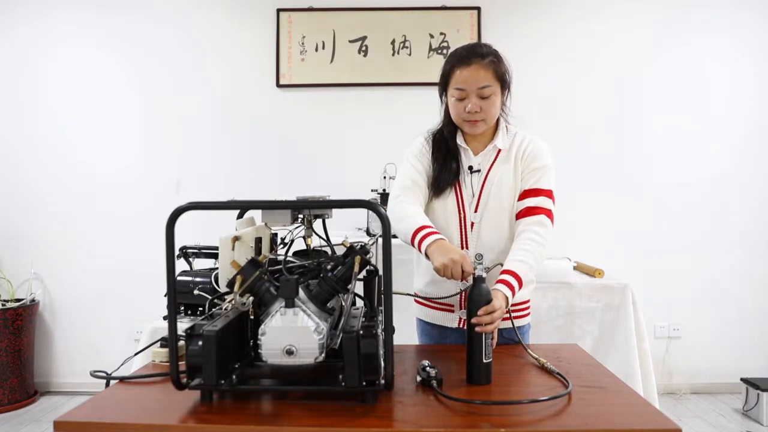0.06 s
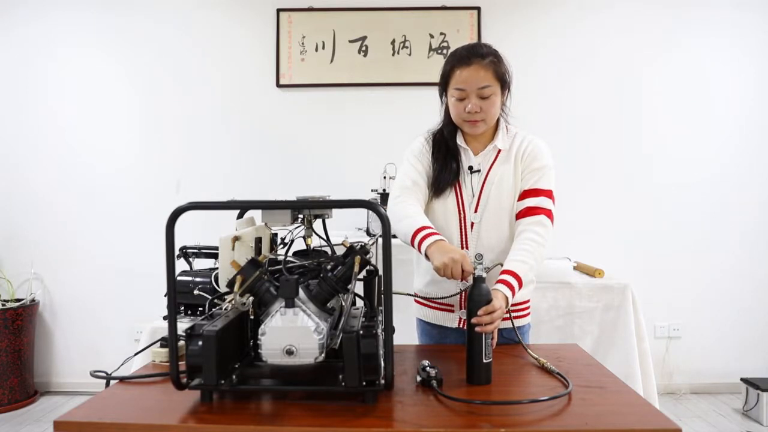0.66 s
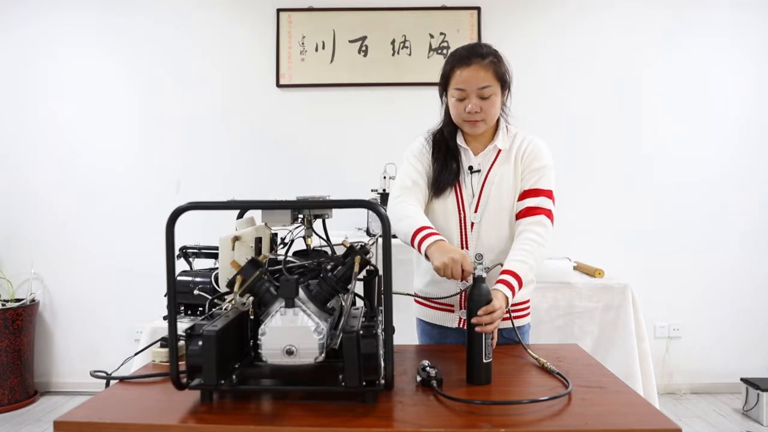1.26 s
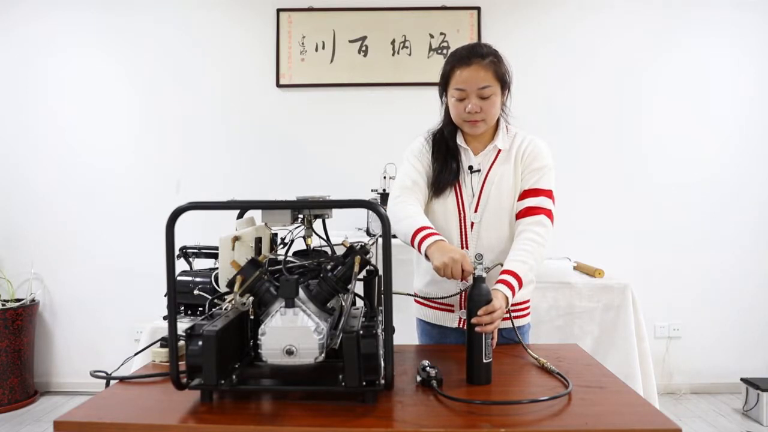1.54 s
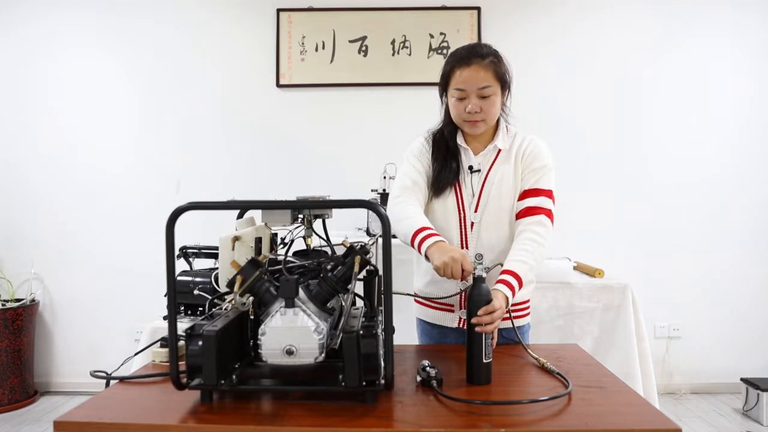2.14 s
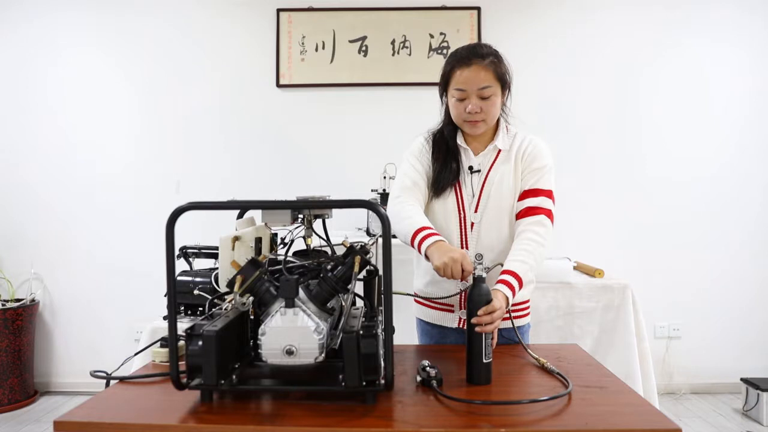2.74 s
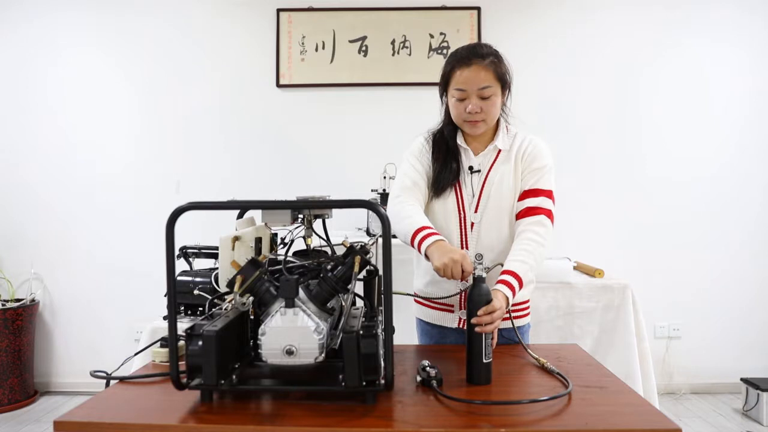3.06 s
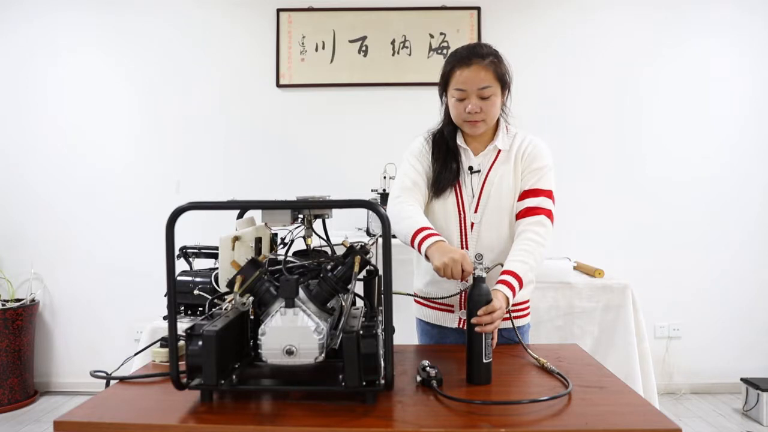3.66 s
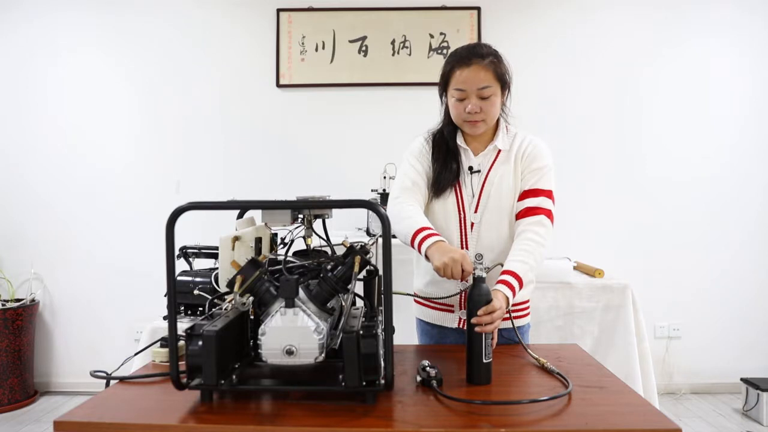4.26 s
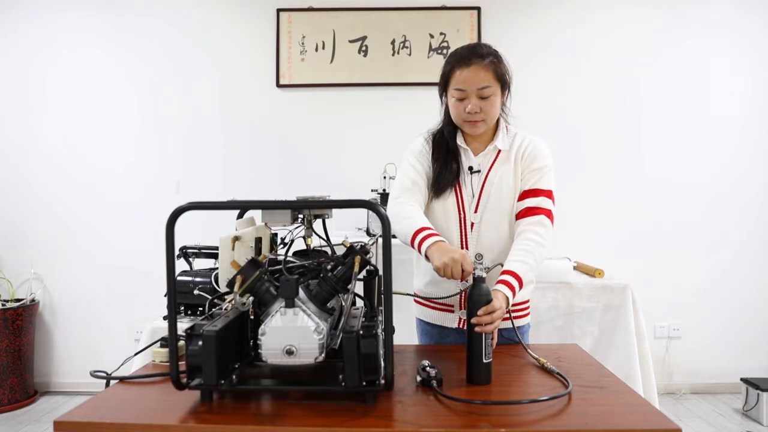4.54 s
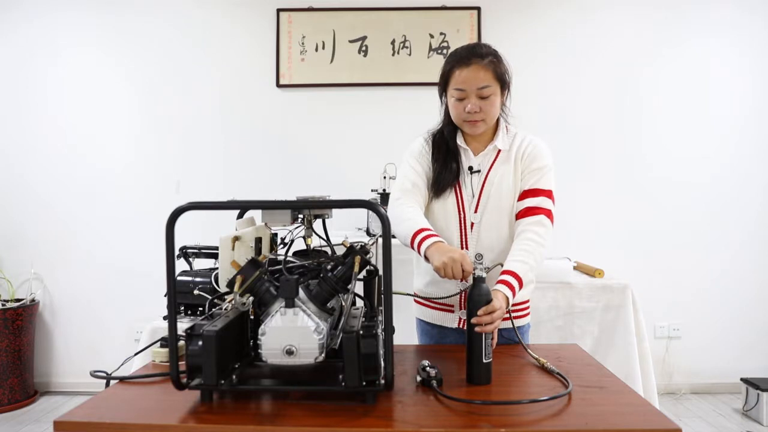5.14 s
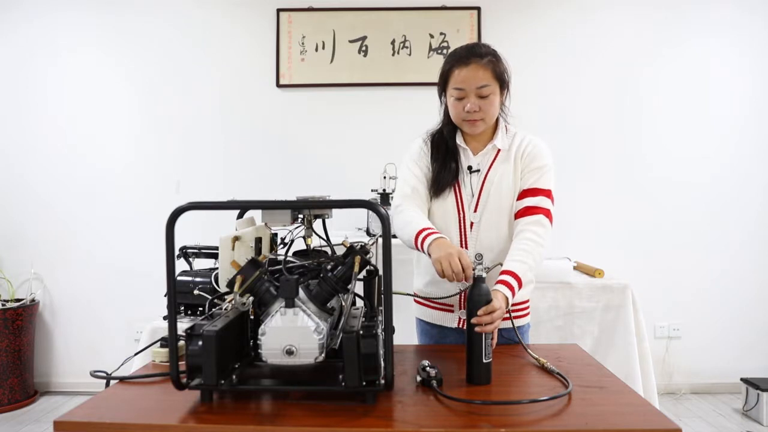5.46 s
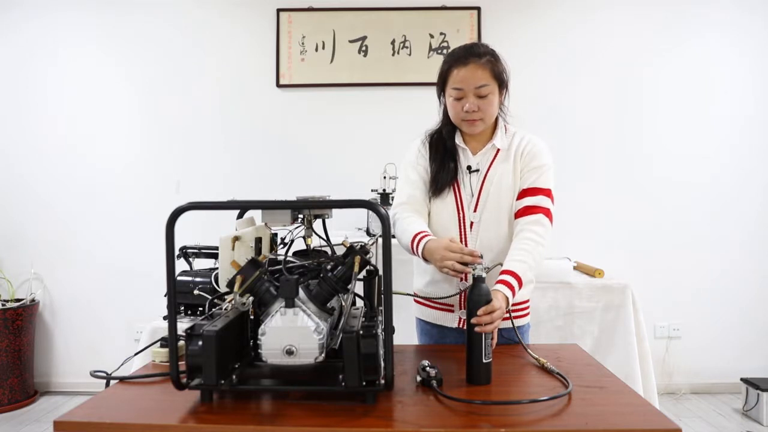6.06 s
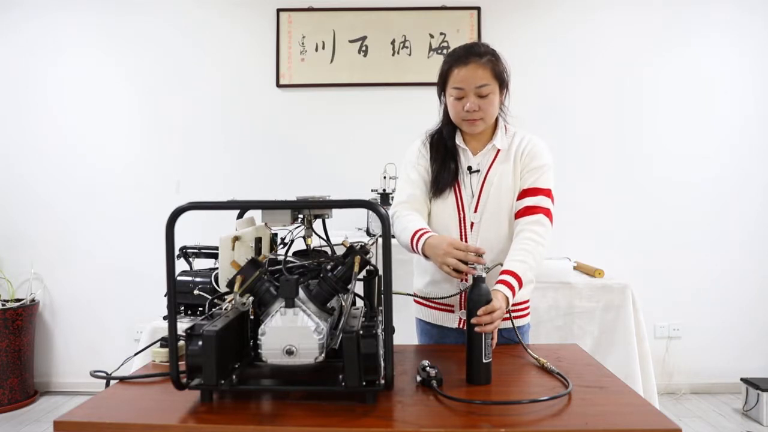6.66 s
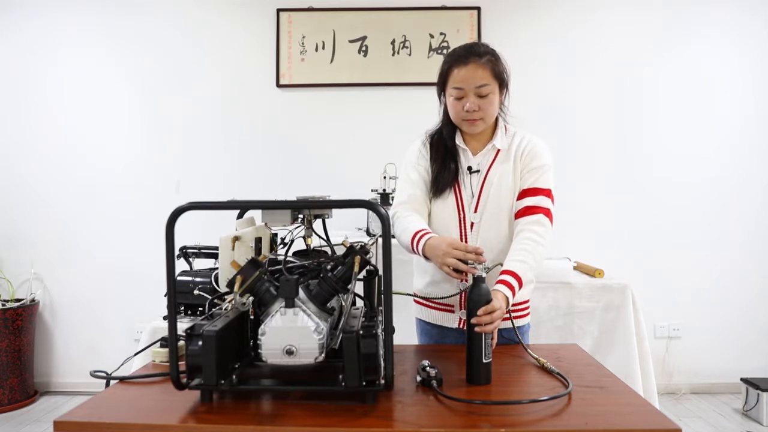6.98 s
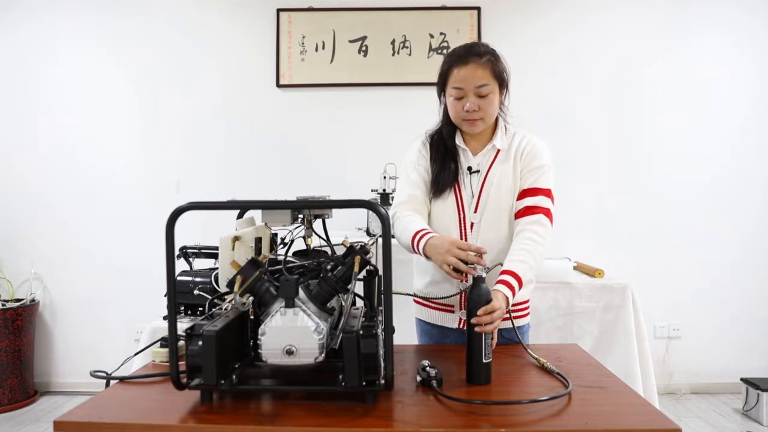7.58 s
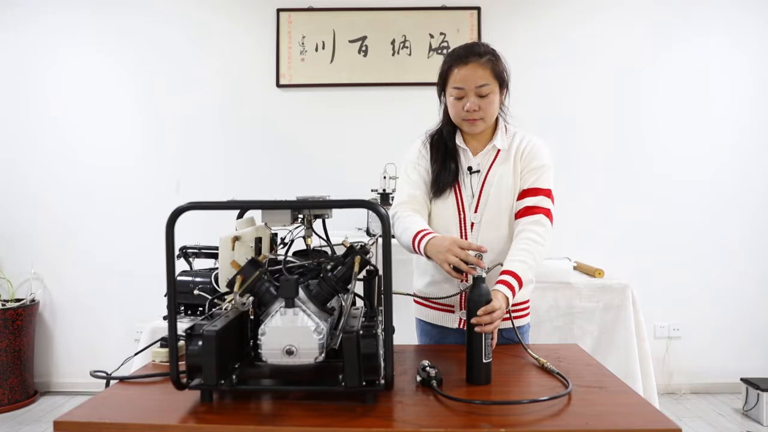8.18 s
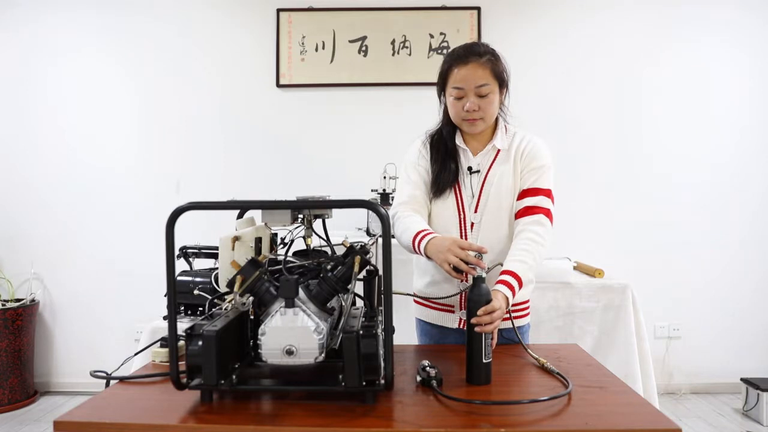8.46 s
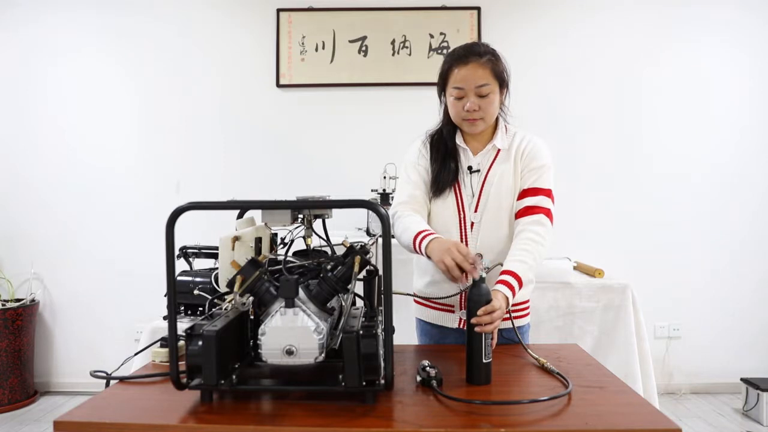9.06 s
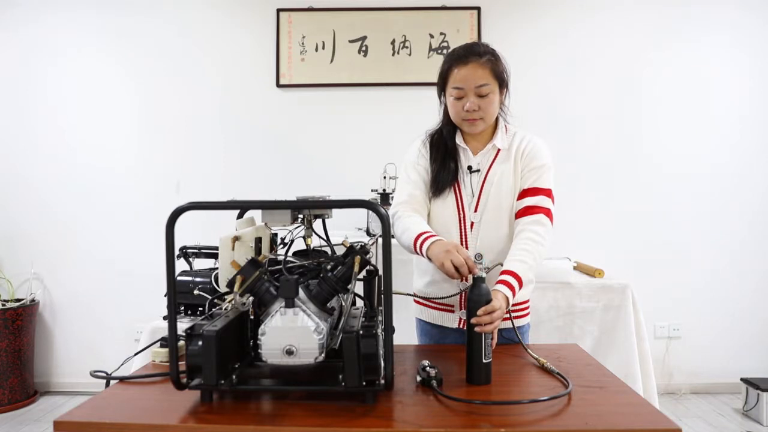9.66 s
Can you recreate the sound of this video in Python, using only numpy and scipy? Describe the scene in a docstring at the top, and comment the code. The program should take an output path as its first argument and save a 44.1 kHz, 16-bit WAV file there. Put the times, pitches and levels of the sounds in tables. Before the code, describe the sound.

A close, steady hiss of compressed air escaping a fitting, flecked with spitting crackles, grows fuller and uneven.

```python
"""High-pressure air bleeds from the fill fitting of a small cylinder, close by, in a faintly answering room.
At first the turbulent jet is a thin, steady hiss in which specks of condensate spit and crackle.
From about 3 s the screw is turned: the jet widens, sags as the gap clogs and spurts as air breaks through.
Between 5 and 6 s a hand cups the valve and shifts its resonances; the jet sputters on to the end."""
import sys
import numpy as np
from scipy import signal
from scipy.fft import rfft, irfft, next_fast_len
from scipy.io import wavfile
from scipy.ndimage import uniform_filter1d, map_coordinates

SR = 44100
rng = np.random.default_rng(int(sys.argv[2]) if len(sys.argv) > 2 else 0)


def log_audio(samples):
    """Write samples as a 16-bit WAV file to the path given in sys.argv[1]."""
    # one column per channel
    frames = np.atleast_2d(samples).T
    # limit to full scale, then quantise
    limited = np.clip(frames, -1, 1)
    pcm = np.round(limited * 32767).astype(np.int16)
    wavfile.write(sys.argv[1], SR, pcm)


N = 432621
TIME = np.arange(N) / SR


def amp(db):
    """Amplitude ratio of a level in decibels."""
    return 10 ** (np.asarray(db) / 20)

def unit(x):
    """Normalisation to unit rms."""
    return x / np.sqrt(np.mean(x ** 2) + 1e-20)

def along(points, hz):
    """Interpolation of (frequency, value) points on a logarithmic frequency axis."""
    frequencies, values = np.transpose(points)
    return np.interp(np.log(hz + 1), np.log(frequencies + 1), values)

def curve(points):
    """Linear interpolation of (time, value) points at every sample."""
    return np.interp(TIME, *np.transpose(points))

def wobble(knots_per_s):
    """Smooth fluctuation: a spline through Gaussian random values."""
    knots = rng.standard_normal(int(N * knots_per_s / SR) + 4)
    return map_coordinates(knots, [TIME * knots_per_s])

def bells(rows, axis):
    """Superposition of Gaussian peaks and dips (centre, width, gain [dB]) in frequency or time."""
    return sum(db * .5 ** ((2 * (axis - centre) / width) ** 2) for centre, width, db in rows)

def coloured(x, db_at):
    """Minimum-phase filtering to the gain db_at(frequency), by folding the cepstrum."""
    size = 2 * next_fast_len(N // 2 + SR // 4)
    hz = np.fft.rfftfreq(size, 1 / SR)
    cepstrum = irfft(np.log(amp(db_at(hz)) + 1e-6))
    cepstrum[1:size // 2] *= 2
    cepstrum[size // 2 + 1:] = 0
    return irfft(rfft(x, size) * np.exp(rfft(cepstrum)))[:N]

def below(x, edge_hz, order):
    """Zero-phase low-pass filtering."""
    size = next_fast_len(N + SR // 2)
    hz = np.fft.rfftfreq(size, 1 / SR)
    return irfft(rfft(x, size) / (1 + (hz / edge_hz) ** order), size)[:N]


# Decay of the room: (frequency [Hz], reverberation time [s])
ROOM_T60 = [(200, 0.32), (3000, 0.69), (15000, 0.22)]

def room(x):
    """Reflection: one weak echo from the nearest wall, then a faint, exponentially decaying tail."""
    hz, t, spectrum = signal.stft(rng.standard_normal(SR // 2), SR, nperseg=256)
    decay = amp(-60 * t / along(ROOM_T60, hz)[:, None])
    tail = signal.istft(spectrum * decay, SR, nperseg=256)[1]
    echo = np.pad(x, (round(.00934 * SR), 0))[:N]
    reverberation = signal.fftconvolve(echo, tail / np.linalg.norm(tail))[:N]
    return amp(-30) * echo + amp(-23) * reverberation


# Spectrum of the spent stream: (frequency [Hz], relative spectral level [dB])
EDDY_SPECTRUM = [(15, -25), (30, -12), (60, -3), (140, 0), (400, 0.5), (750, -0.5), (1100, -5), (2000, -13),
                 (5000, -81)]

def eddies(rumble_db, lumpy_db):
    """Turbulent break-up: the spent stream dissolves into a soft, lumpy rumble."""
    rumble = unit(coloured(rng.standard_normal(N), lambda hz: along(EDDY_SPECTRUM, hz)))
    return rumble * amp(rumble_db + lumpy_db * wobble(60))


# Spectrum of one drop's pulse: (frequency [Hz], gain [dB])
DROP_SPECTRUM = [(20, -25), (70, -7), (180, 2), (600, 0.5), (1200, -3), (2800, -6), (3800, -8), (5000, -2),
                 (15000, -1)]
# Spits of the larger drops: (time [s], relative level [dB])
SPITS = [(0.146, -19), (0.392, -21), (0.926, -21), (0.963, -19), (1.349, -23), (1.452, -26), (1.718, -15),
         (1.815, -20), (2.007, -23), (2.166, -21), (2.543, -33), (2.859, -19.5), (3.044, -21), (3.3, -22),
         (3.411, -18), (3.457, -16), (3.934, -19), (4.083, -16.5), (4.761, -22), (5.015, -20), (5.789, -26),
         (5.817, -14), (6.029, -17), (6.522, -18), (8.295, -23), (8.562, -19), (9.003, -20), (9.721, -20)]

def condensate(rumble_db, specks_per_s, spread_db, spit_gain_db, puff_db, puff_s):
    """Impulse excitation: each drop blown through the gap is a pressure pulse; large ones trail a puff."""
    sizes = amp(spread_db * np.minimum(rng.exponential(size=N), 3)) * rng.choice([-1, 1], N)
    specks = unit(sizes * (rng.random(N) < specks_per_s / SR))
    above_rumble_db = np.interp(TIME, [3.5, 6], [10, 8])  # thin jet, then wide jet
    pulses = specks * amp(rumble_db + above_rumble_db)
    age = np.arange(SR // 20) / SR
    for at, db in SPITS:
        impulse = (age == 0) * rng.choice([-1, 1])
        puff = amp(puff_db) * np.exp(-age / puff_s) * rng.standard_normal(len(age))
        pulses[round(at * SR):][:len(age)] += amp(db + spit_gain_db) * (impulse + puff)
    return coloured(pulses, lambda hz: along(DROP_SPECTRUM, hz))


# The gap clogs: (time of clearing [s], duration [s], hiss loss [dB], roar loss [dB], recovery [s])
CHOKES = [(3.914, 0.126, 1, 3, 0.012), (4.071, 0.08, 3, 1.0, 0.012), (4.324, 0.13, 2, 8.5, 0.008),
          (4.425, 0.07, 1, 1, 0.012), (4.776, 0.1, -1, 6.5, 0.027), (4.875, 0.066, 7.5, 1.5, 0.012),
          (5.015, 0.15, 5, -1.5, 0.006), (5.119, 0.098, 2.0, 2.5, 0.008), (5.308, 0.015, 5.0, 2.5, 0.008),
          (5.611, 0.27, 3, 0.5, 0.012), (5.942, 0.036, 4.0, 1, 0.008), (6.022, 0.07, 4.0, -1.5, 0.008),
          (6.143, 0.13, 2, -2, 0.012), (6.347, 0.27, 0, 5.5, 0.025), (6.541, 0.12, 3, 2.5, 0.012),
          (6.62, 0.035, 0, 6, 0.012), (6.806, 0.034, 0.0, 8, 0.0085), (7.064, 0.068, 5.5, 5.5, 0.01),
          (7.143, 0.067, 2.5, 3.5, 0.012), (7.72, 0.15, 0.0, 4, 0.02), (7.903, 0.12, 7, 4.5, 0.018),
          (8.113, 0.029, 4, 2.0, 0.012), (8.229, 0.031, 3.5, 0.5, 0.012), (8.545, 0.18, 10.5, 1.5, 0.056),
          (8.713, 0.095, 8.0, -1, 0.022), (8.885, 0.081, 3.5, 2.0, 0.02), (9.189, 0.13, 7.5, 7.5, 0.012),
          (9.333, 0.11, 8.0, 4.5, 0.01), (9.4, 0.061, 8.5, 1, 0.016), (9.52, 0.062, 4.5, 2, 0.008),
          (9.612, 0.081, 4, 6.0, 0.016), (9.655, 0.037, 5, 9, 0.0072), (9.713, 0.049, 2, 7, 0.008)]
# Pent-up air breaks through: (time [s], decay time [s], hiss gain [dB], roar gain [dB])
SPURTS = [(1.403, 0.041, 2.0, 0.5), (3.042, 0.037, 0, 2.0), (3.298, 0.11, 2.5, 2.5), (3.723, 0.1, 3.5, 2),
          (3.91, 0.07, 3.5, -0.5), (4.073, 0.085, 3.5, -3.5), (4.344, 0.032, 1, 2), (4.48, 0.075, 4, -1.5),
          (4.666, 0.038, 6, 0.5), (5.012, 0.049, 4, 1), (5.118, 0.021, 2, 5), (5.408, 0.015, 4.5, -1),
          (5.617, 0.17, 0.0, 5.5), (5.726, 0.036, 2.5, 3.5), (6.027, 0.05, 3.5, 1.5), (6.37, 0.081, 5, -1),
          (6.54, 0.026, 1.5, 1.5), (6.826, 0.25, 3, 1.5), (7.408, 0.24, 2.5, 1), (7.9, 0.046, 1.5, 2),
          (8.056, 0.055, 0.5, 5), (8.287, 0.092, 1, 1.5), (8.56, 0.05, 3, 0.5), (8.715, 0.047, 3.5, 2),
          (9.004, 0.013, 3.5, 8.5), (9.18, 0.094, 2.5, 0.0), (9.517, 0.024, 4, 4)]

def chokes_and_spurts(sinking_share=0.51, attack_s=0.0071):
    """Throttling: hiss and roar, in dB, sag as the gap clogs, snap back, and overshoot in spurts."""
    swing_db = np.zeros((2, N))
    for at, duration, hiss_db, roar_db, recovery_s in CHOKES:
        near = np.abs(TIME - at) < .4
        age = TIME[near] - at
        clogging = np.clip((age + duration) / (sinking_share * duration), 0, 1)
        uncleared = np.clip(.5 - age / recovery_s, 0, 1)
        swing_db[:, near] -= np.outer([hiss_db, roar_db], clogging * uncleared)
    for at, decay_s, hiss_db, roar_db in SPURTS:
        near = np.abs(TIME - at) < .4
        age = TIME[near] - at
        surge = np.clip(.5 + age / attack_s, 0, 1) * np.exp(-(age / decay_s) ** 2)
        swing_db[:, near] += np.outer([hiss_db, roar_db], surge)
    return swing_db


# Rumble between chokes and spurts: (time [s], level [dB])
RUMBLE_LEVEL = [(0, -44), (2.9, -45), (3.45, -43), (4.0, -44), (4.7, -42), (5.3, -46), (5.9, -45),
                (6.9, -43), (7.5, -43), (8.6, -42.5), (9.3, -44), (9.81, -45.5)]
# Travel of the screw: (time [s], opening [about 0 just cracked, about 1 wide])
SCREW_OPENING = [(0.0, -0.13), (2.7, -0.092), (3.2, -0.11), (3.85, 0.33), (4.1, 1.18), (4.65, 0.89),
                 (5.0, 0.68), (5.45, 0.38), (5.7, 0.56), (6.2, 0.8), (6.9, 0.85), (7.6, 0.85), (8.1, 0.76),
                 (9.0, 0.96), (9.45, 1.33), (9.81, 0.77)]

def flow_levels(cracked_drift_db, wide_drift_db):
    """Flow noise follows the aperture: a wider gap favours the lower bands; chokes and spurts swing all."""
    opening = curve(SCREW_OPENING)
    hiss_swing, roar_swing = chokes_and_spurts()
    hiss_db = -18.5 - 1.9 * opening + hiss_swing
    rush_db = -27.5 + 4.5 * opening + 0.49 * hiss_swing + 0.4 * roar_swing
    roar_db = -39 + 7.5 * opening + roar_swing
    rumble_db = curve(RUMBLE_LEVEL) + 0.49 * hiss_swing + 0.43 * roar_swing
    drift_db = cracked_drift_db + (wide_drift_db - cracked_drift_db) * opening
    return [level + drift_db * wobble(50) for level in (hiss_db, rush_db, roar_db, rumble_db)]


def flutter(steady_db, turning_db, grain_db):
    """Amplitude modulation: the jet trembles, more once the screw turns, and shocklets roughen it."""
    depth_db = np.interp(TIME, [3.3, 4.5], [steady_db, turning_db])
    tremble = unit(.5 * wobble(35) + 0.66 * wobble(80) + wobble(250))
    return depth_db * tremble + grain_db * wobble(1800)


# Hollow under the palm, the first row holding from the start: (time [s], frequency [Hz], strength [dB])
PALM_HOLLOW = [(5.2, 6500, 5), (5.7, 5600, 7), (6.05, 5600, 10.5), (6.6, 5700, 0.5), (6.85, 8200, 5.5),
               (7.05, 7440, 3), (7.4, 7800, 7.5), (7.75, 6300, 4.5), (8.4, 5740, 7), (8.9, 5140, 4),
               (9.3, 6500, 3), (9.8, 7500, 5.5)]
# A finger channels or shades the air: (time [s], duration [s], frequency [Hz], bandwidth [Hz], gain [dB])
FINGER_GAPS = [(4.358, 0.019, 8000, 9000, 5), (5.665, .06, 6000, 1200, 4.5), (5.83, .15, 14800, 1600, 5),
               (5.92, .08, 12400, 2000, -8), (6.493, .025, 1970, 700, 8), (6.55, 0.048, 6000, 1200, 9),
               (6.763, 0.013, 1950, 900, 9), (7.15, 0.55, 1410, 300, 4.5)]

def turbulence(patchy_db, hollow_width_hz):
    """Cavity resonance: palm and finger gaps shape a noise whose colour drifts in small patches."""
    hz, t, spectrum = signal.stft(rng.standard_normal(N), SR, nperseg=512)
    patches = uniform_filter1d(rng.standard_normal(spectrum.shape), size=8, axis=0)
    patches = unit(uniform_filter1d(patches, size=32, axis=1))
    times, pitch_hz, strength_db = np.transpose(PALM_HOLLOW)
    centre, strength = np.interp(t, times, pitch_hz), np.interp(t, times, strength_db)
    hollow = [(centre, hollow_width_hz, strength), (centre, 2 * hollow_width_hz, -strength / 2)]
    fingers = [(pitch, width, bells([(at, duration, db)], t))
               for at, duration, pitch, width, db in FINGER_GAPS]
    gain_db = patchy_db * patches + bells(hollow + fingers, hz[:, None])
    return signal.istft(spectrum * amp(gain_db), nperseg=512)[1][:N]


# Smooth spectrum of the jet: (frequency [Hz], relative spectral level [dB])
JET_SPECTRUM = [(300, -29), (900, -21), (1500, -8.5), (2800, -7.5), (4500, -6.5), (6300, -2), (9000, -3),
                (12500, -5), (15700, -3)]
# Resonances and shadows of the fitting, fingers beside it: (frequency [Hz], bandwidth [Hz], gain [dB])
BARE_RESONANCES = [(2100, 500, 1.5), (3250, 500, 3), (3780, 450, -11), (4850, 400, 2.5), (5720, 220, -4),
                   (7300, 400, -2.5), (7950, 450, 2.5), (8600, 450, -2.5), (9750, 400, -3.5),
                   (10400, 350, 2), (11050, 350, -2.5), (11700, 600, 4.5), (12620, 400, -4.5),
                   (13250, 650, 2.5), (14400, 600, -3), (15500, 500, 2.5)]
# The same under the cupped hand: (frequency [Hz], bandwidth [Hz], gain [dB])
CUPPED_RESONANCES = [(780, 350, 6), (2080, 330, 3.7), (3200, 500, 1.3), (3800, 450, -6.5), (4800, 400, 2),
                     (6000, 400, 1.5), (7320, 350, -3), (7950, 500, 3), (8550, 400, -3), (9750, 450, -2.5),
                     (10400, 400, 1.5), (11550, 600, 2.5), (12300, 500, -3.5), (13120, 500, 3.5),
                     (13780, 550, -4.5), (14700, 700, 3), (15700, 600, -2.5)]
# The hand moves over the valve: (time [s], cover [0 to 1])
HAND_COVER = [(5.2, 0), (5.8, 1)]

def jet(hiss_db, rush_db, roar_db):
    """Turbulent jet noise resonates around the fitting: a fine hiss, a wide rush and a hollow roar."""
    def ringing(resonances):
        noise = turbulence(patchy_db=0.79, hollow_width_hz=3700)
        return unit(coloured(noise, lambda hz: along(JET_SPECTRUM, hz) + bells(resonances, hz)))

    cover = curve(HAND_COVER)
    air = np.sqrt(1 - cover) * ringing(BARE_RESONANCES) + np.sqrt(cover) * ringing(CUPPED_RESONANCES)
    roar = below(air, edge_hz=3430, order=16)
    rush = below(air, edge_hz=9930, order=10) - roar
    hiss = air - rush - roar
    return amp(hiss_db) * unit(hiss) + amp(rush_db) * unit(rush) + amp(roar_db) * unit(roar)


def scene():
    """Superposition: one flow drives drops, jet and rumble, heard alike in both channels."""
    hiss_db, rush_db, roar_db, rumble_db = flow_levels(cracked_drift_db=0.12, wide_drift_db=0.6)
    flutter_db = flutter(steady_db=.5, turning_db=1.2, grain_db=0.9)
    stir_db = bells([(at, 0.098, 0.5) for at, _ in SPITS], TIME)  # each spit briefly stirs the rumble
    drops = condensate(rumble_db, specks_per_s=150, spread_db=7.0,
                       spit_gain_db=22.5, puff_db=-23, puff_s=0.0038)
    stream = amp(flutter_db) * jet(hiss_db, rush_db, roar_db)
    rumble = eddies(rumble_db + stir_db + .5 * flutter_db, lumpy_db=2.0)
    direct = rumble + drops + stream
    return np.tile(direct + room(direct), (2, 1))

def record(dry):
    """Soft saturation rounds the tallest peaks; a steep low-pass limits the bandwidth."""
    rounded = dry / (1 + (dry / .55) ** 6) ** (1 / 6)
    return np.array([below(channel, edge_hz=15770, order=900) for channel in rounded])


dry = scene()
out = record(dry)
log_audio(out)
```